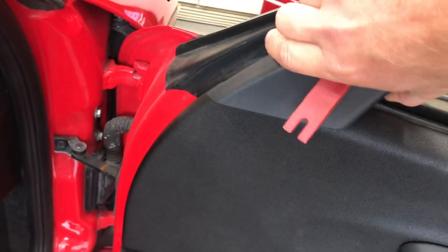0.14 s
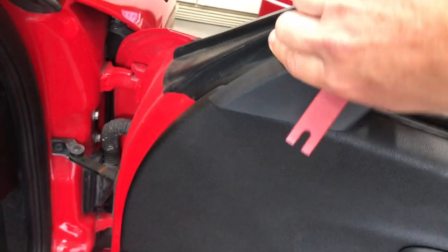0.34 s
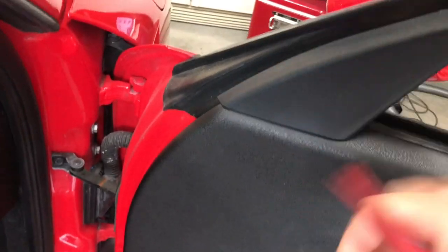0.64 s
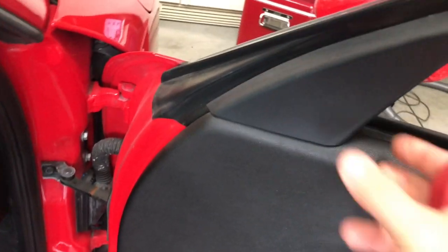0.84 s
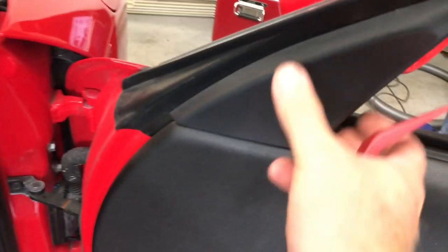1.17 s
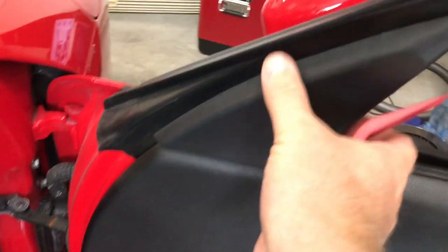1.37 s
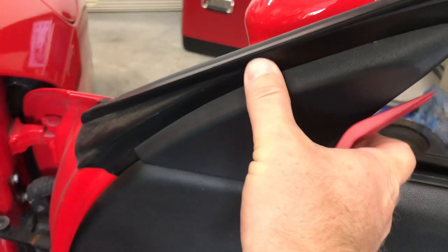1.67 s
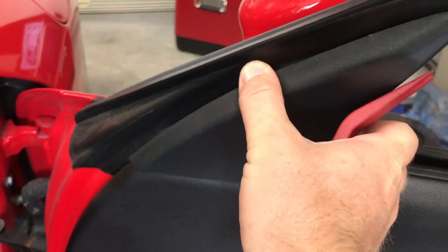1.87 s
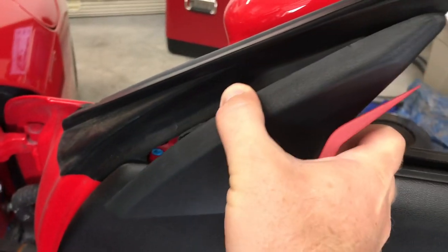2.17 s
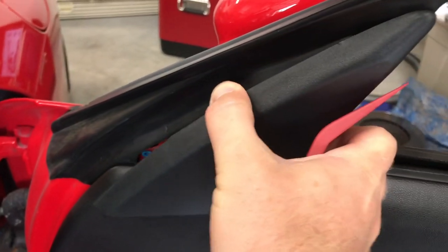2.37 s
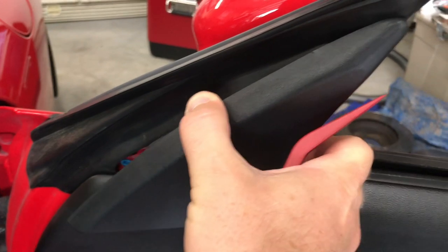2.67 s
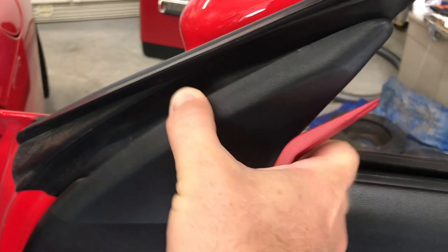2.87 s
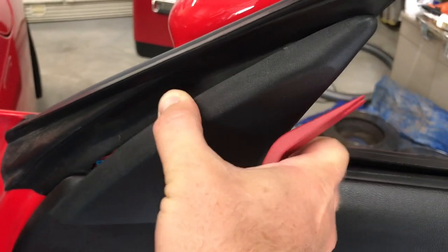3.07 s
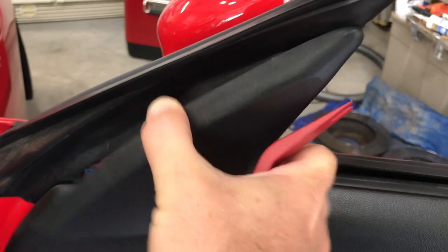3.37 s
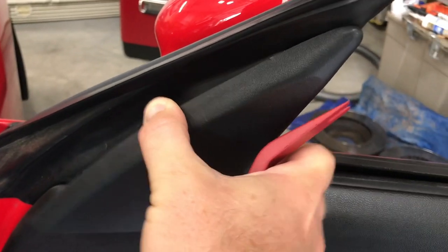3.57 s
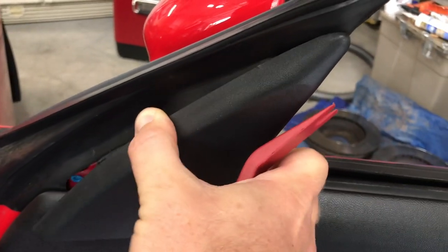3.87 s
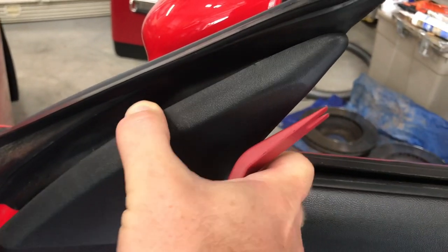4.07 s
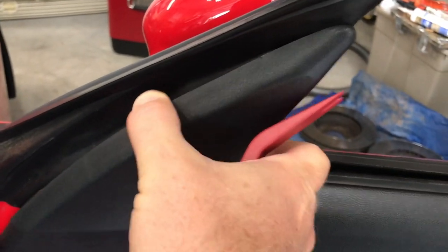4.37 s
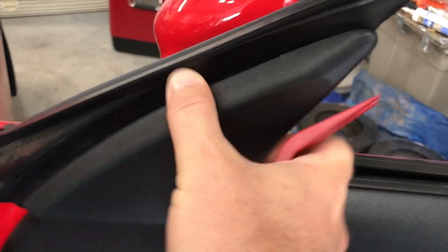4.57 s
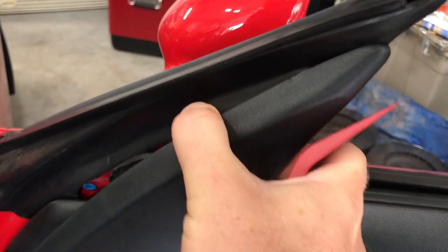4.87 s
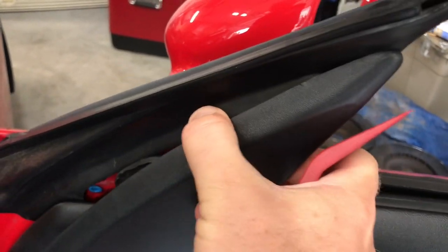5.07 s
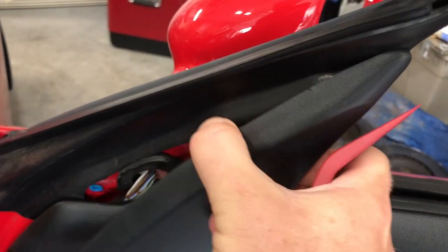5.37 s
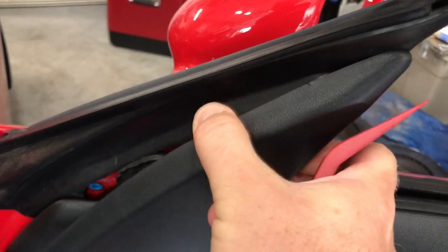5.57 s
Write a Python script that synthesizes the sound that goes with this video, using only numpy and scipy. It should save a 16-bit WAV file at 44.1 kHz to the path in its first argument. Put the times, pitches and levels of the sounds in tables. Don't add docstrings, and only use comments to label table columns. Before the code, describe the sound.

A phone close to a car door in a garage hears quiet low rumble, hiss and a faint steady band of insects. Tiny ticks start the scene; around 0.5 s they bunch into a quick plastic clatter and a short hollow pop as the pry tool springs free, with a brief scrape and soft door thump. A faint wavering distant whine lies under the first second. From 1 to 2.8 s there are only light skin rubs, small clicks and muted knocks as the hand finds its grip. At 2.87 s a bright, sharp snap rings the thin trim edge. Rocking then brings irregular clicks and short stuttering creaks, notably at 3.0, 3.2, 3.3 and 3.5 s, with dull low thumps, continuing more sparsely past 4 s. A strong double crack comes at about 5.08 s, with faint falling whines and a peep nearby, then small final clicks at 5.55-5.7 s.

```python
import sys
import numpy as np
from scipy import signal
from scipy.fft import rfft, irfft
from scipy.io import wavfile
from scipy.ndimage import uniform_filter1d

SR = 44100
rng = np.random.default_rng(int(sys.argv[2]) if len(sys.argv) > 2 else 0)


def voltage_ratio(decibels):
    exponent = np.asarray(decibels, float) / 20
    return 10 ** exponent


def dump_mix(stems):
    frames = np.atleast_2d(stems).T
    limited = np.clip(frames, -1, 1)
    pcm = np.round(limited * 32767).astype(np.int16)
    wavfile.write(sys.argv[1], SR, pcm)


N = 252241

# centre in Hz, level in dB, t60 in seconds.
EDGE_BANDS = [(3900, -11.5, 0.039), (4500, -5, 0.0093), (5525, 0.5, 0.019), (6890, -0.5, 0.014),
              (8470, -2, 0.017), (10700, -31.5, 0.0027), (11950, -11, 0.014), (13800, -25, 0.0041),
              (14900, -50, .011)]
PANEL_BANDS = [(1183, -6, 0.034), (1365, -0.5, 0.044), (1824, -1, 0.032), (2590, -0.5, 0.018),
               (3180, 0.5, 0.024)]
# frequency in Hz, level in dB, t60 in seconds.
HOLLOW_MODES = [(425, -10.5, 0.15), (336, -7, 0.12), (501, -11.5, 0.22), (612.6, 6, 0.046),
                (683, 0.5, 0.082), (875, 7.5, 0.02)]
TOOL_MODES = [(320, -3, 0.036), (405, -28, 0.11), (1600, -3, 0.078), (1800, -12, 0.065), (1750, 7.5, 0.034),
              (2060, -8, 0.062), (2360, -28, 0.045)]
# start in seconds, level in dB.
TOOL_POP = (.5336, -20)
# start in seconds, edge tick in dB, panel knock in dB, loudest knock mode in Hz, door hollow in dB.
GRIP_SLIPS = [(0.0601, -67, -57.5, 1960, -50), (0.2275, -50, -53, 1880, -52),
              (0.3593, -45, -43, 1530, -47.5), (0.4832, -66, -52, 1330, -46), (0.4897, -46, -48, 2000, -62),
              (0.5132, -40, -55, 1670, -60), (0.5249, -29.5, -36.5, 1770, -34.5),
              (0.5332, -28.5, -29, 1650, -29.5), (0.8483, -52, -76, 1770, -73),
              (1.045, -45, -40, 1650, -43), (1.0533, -36, -53, 1570, -37), (1.2184, -48, -50, 1530, -48),
              (1.2367, -45.5, -57, 1510, -46.5), (1.2717, -48, -66, 1650, -59),
              (1.5087, -53, -54, 3100, -52.5), (1.7755, -52, -57, 1970, -48.5),
              (1.8107, -51, -56.5, 1550, -52), (1.8709, -40.5, -38, 1640, -34.5),
              (2.0818, -45, -44, 1680, -42.5), (2.0992, -48, -48, 1920, -59),
              (2.2369, -62, -57.5, 2560, -49), (2.4508, -64, -52, 2500, -50),
              (2.7551, -65, -63.5, 3180, -67), (2.8602, -43, -49, 2700, -46)]
ROCK_SLIPS = [(2.8735, -18.5, -28.5, 3020, -27.5), (3.0343, -31.5, -39, 2420, -38),
              (3.1467, -42, -39, 2460, -37.5), (3.4735, -32.5, -36.5, 2480, -36),
              (3.8328, -46, -56, 3220, -52), (3.8734, -40, -40, 2460, -38), (3.8874, -45, -42.5, 1300, -62),
              (3.8944, -39, -39, 3070, -38.5), (3.9053, -35, -38, 3220, -55),
              (3.9129, -45, -47, 1830, -35.5), (4.029, -68, -58, 1000, -56),
              (4.1409, -31, -43.5, 2640, -58), (4.3539, -64, -47, 2650, -49),
              (4.3968, -46.5, -47.5, 1730, -41), (4.418, -33.5, -37, 2340, -39.5),
              (4.5096, -38.5, -54.5, 1300, -41), (4.694, -45.5, -58, 2650, -48),
              (4.9382, -45.5, -79, 3800, -80), (5.0721, -26.5, -29.5, 1824, -27),
              (5.2415, -45, -57, 1950, -46), (5.5461, -42, -50, 1300, -33.5), (5.552, -47, -47, 1680, -59),
              (5.6392, -57, -57, 1820, -50), (5.6955, -39, -44.5, 1630, -36.5)]


def slips():
    knock_cycles, hollow_lag_s, regrip_s, jerk_s = 73, 0.00487, 0.06, 0.00027
    out, hollow, last_s = np.zeros(N + SR), np.zeros(N + SR), -1
    rows = sorted(GRIP_SLIPS + ROCK_SLIPS + creaks())
    jerks = 0.18 * rng.standard_normal((len(rows), 64)) * np.exp(-np.arange(64) / (jerk_s * SR))
    for (s, tick_db, knock_db, hz, hollow_db), jerk in zip(rows, jerks):
        if s - last_s > regrip_s:
            edge = rattle(EDGE_BANDS)
            panel = rattle([(f, db - 4 * abs(np.log2(f / hz)), t60) for f, db, t60 in PANEL_BANDS])
        last_s = s
        push = np.append(1, jerk)
        push = push / np.linalg.norm(push)
        plate = voltage_ratio(tick_db + 2.5) * edge + voltage_ratio(knock_db + 4.0) * panel
        add_at(out, s, np.convolve(push, plate))
        cluster = [(hz, 0, knock_cycles / hz), (1.19 * hz, -7, 0.025), (0.86 * hz, -9, 0.025)]
        add_at(out, s, voltage_ratio(knock_db + 0.5) * ring(cluster, 0.00018))
        hollow[int(s * SR) + int(hollow_lag_s * SR)] += voltage_ratio(hollow_db - 4.0)
    pop_s, pop_db = TOOL_POP
    add_at(out, pop_s, voltage_ratio(pop_db) * ring(TOOL_MODES, 0.0011))
    return out[:N] + strike(hollow, ring(HOLLOW_MODES, 0.00074))


# first slip in seconds, last slip in seconds, first tick in dB,
# last tick in dB, last knock in dB.
CREAKS = [(2.5545, 2.576, -70, -67.5, -53.5), (2.9846, 3.0001, -50, -41, -52),
          (3.007, 3.0223, -34, -29, -39.5), (3.166, 3.201, -45, -27, -33.5),
          (3.29, 3.3031, -52, -56.5, -58.5), (3.304, 3.3704, -54, -26, -37.5),
          (3.4837, 3.5253, -34.5, -28, -36.5), (3.719, 3.737, -38, -28.5, -36.5),
          (4.0825, 4.1, -49.5, -54.5, -59), (4.1476, 4.163, -31.5, -28, -34),
          (5.0834, 5.098, -19, -20, -30.5)]
CREAK_SLIPS = (3, 3, 3, 4, 4, 10, 8, 3, 4, 3, 2)


def creaks():
    slowing_db = 36
    easing = 1.12
    knock_follows, knock_hz, hz_spread, scatter_db = 0.73, 2677, 0.046, 0.98
    hollow_db, hollow_top_db = 0, -28.5
    rows = []
    for (first_s, last_s, first_db, last_db, last_knock_db), count in zip(CREAKS, CREAK_SLIPS):
        gaps = np.exp((last_db - first_db) / slowing_db * np.linspace(0, 1, count - 1))
        s = first_s + (last_s - first_s) * np.append(0, np.cumsum(gaps)) / gaps.sum()
        tick_db = last_db + (first_db - last_db) * np.linspace(1, 0, count) ** easing
        chance = rng.standard_normal((count, 4)).T
        scatter = scatter_db * chance[:3]
        knock_db = last_knock_db + knock_follows * (tick_db - last_db)
        door_db = tick_db + np.minimum(hollow_db, hollow_top_db - tick_db)
        hz = knock_hz * np.exp(hz_spread * chance[3])
        rows += zip(s, tick_db + scatter[0], knock_db + scatter[1], hz, door_db + scatter[2])
    return rows


def rattle(bands):
    travel_s = 0.00072
    t, y = np.arange(SR // 20) / SR, 0
    for (hz, db, t60), noise in zip(bands, rng.standard_normal((len(bands), len(t)))):
        lag_s = travel_s / np.sqrt(hz / 1000)
        fade = (1 - np.exp(-(t / lag_s) ** 2)) * 1000 ** (-t / t60)
        burst = fade * band(noise, hz, 0.21 * hz)
        y = y + voltage_ratio(db) * burst / np.linalg.norm(burst)
    return y / np.abs(y).max()


def ring(modes, rise_s):
    t, y = np.arange(SR // 4) / SR, 0
    for k, (hz, db, t60) in enumerate(modes):
        y = y + (-1) ** k * voltage_ratio(db) * np.sin(2 * np.pi * hz * t) * 1000 ** (-t / t60)
    y = y * (1 - np.exp(-t / rise_s))
    return y / np.abs(y).max()


def strike(force, response):
    return signal.fftconvolve(force, response)[:N]


def add_at(out, s, sound):
    i = int(s * SR)
    out[i:i + len(sound)] += sound


def band(x, hz, width_hz):
    b, a = signal.iirpeak(hz, hz / width_hz, SR)
    return signal.lfilter(b, a, signal.lfilter(b, a, x))


def unit(x):
    return x / np.sqrt(np.mean(x ** 2))


def walk(rate_hz):
    k = int(SR / rate_hz)
    steps = np.repeat(rng.standard_normal(N // k + 1), k)
    return unit(uniform_filter1d(uniform_filter1d(steps, k), k)[:N])


# start in seconds, length in seconds, level in dB, weight on the door in dB.
TOOL_DRAGS = [(0.478, 0.04, -51.5, -9), (0.506, 0.015, -41.5, -15), (0.525, 0.0262, -41, -11)]
SKIN_SLIDES = [(0.364, 0.084, -68.5, 6), (1.035, 0.038, -65, 7), (1.116, 0.041, -60, -3),
               (1.197, 0.061, -61, -1.5), (1.248, 0.025, -74, 0), (1.452, 0.082, -66, -1),
               (1.723, 0.072, -65.5, -1.5), (1.934, 0.16, -69, -2), (4.494, 0.11, -62, -1.5),
               (5.534, 0.026, -61, 0)]
EDGE_SCRAPES = [(1.35, 0.02, -62, -18), (1.592, 0.017, -68, 2.5), (1.814, 0.069, -68.5, 2),
                (1.866, 0.11, -69.5, -4), (2.088, 0.042, -52, 1.2), (2.51, 0.025, -66, -1.5),
                (2.536, 0.051, -64.5, 6.5), (2.612, 0.011, -70, 6), (3.671, 0.045, -64.5, 1.5),
                (3.893, 0.0277, -47, 0), (4.019, 0.037, -62.5, 3.5), (4.084, 0.052, -65, 3),
                (4.339, 0.038, -57, 1.5), (5.318, 0.053, -68.5, 1)]
PALM_PRESSES = [(0.041, 0.052, -73, 7.5), (0.529, 0.027, -64, 5), (0.581, 0.053, -79, 9),
                (2.231, 0.023, -84.5, 25.6), (2.973, 0.053, -71, 8), (4.676, 0.038, -66.5, 8.1),
                (5.13, 0.12, -66, 1.3)]


def rubs():
    t = np.arange(N) / SR
    grit = rng.standard_normal(N) * voltage_ratio(3.35 * rng.exponential(size=N)) * voltage_ratio(1.4 * walk(150))
    sizzle = band(grit, 9000, 7000) + 0.9 * band(grit, 11500, 350)
    scrape = band(grit, 4600, 3500) + 1.3 * band(grit, 2650, 350)
    panel = band(grit, 1570, 1040) + 2.5 * band(grit, 1630, 190)
    hollow = band(grit, 720, 1570) + 0.0011 * strike(grit, ring(HOLLOW_MODES, 0.0038))
    # sizzle, scrape, panel in dB
    touches = ((TOOL_DRAGS, (-13.5, -0.54, 1.5)), (SKIN_SLIDES, (-1.5, 1, -5.5)),
               (EDGE_SCRAPES, (-22, 0.1, -8.5)), (PALM_PRESSES, (-14, -3, -0.67)))
    pressure = np.zeros((4, N))
    for rows, feeds_db in touches:
        for s, length_s, db, weight_db in rows:
            press = (t - s) / (0.18 * length_s)
            lift = (s + length_s - t) / (0.09 * length_s) + 0.5
            touch = np.clip(np.minimum(press, lift), 0, 1)
            pressure += voltage_ratio(db + np.append(feeds_db, weight_db) - 0.5)[:, None] * touch
    return sum(p * unit(x) for p, x in zip(pressure, (sizzle, scrape, panel, hollow)))


# start in seconds, peak in dB, frequency in Hz.
THUMPS = [(0.534, -34.5, 152), (1.047, -43.5, 153.6), (1.876, -52, 195), (2.101, -52, 214),
          (2.876, -49.5, 173), (3.028, -49, 247), (3.181, -47.5, 283), (3.363, -47, 239), (3.503, -38, 169),
          (3.741, -45, 164.5), (3.897, -49.5, 236), (4.157, -45, 159), (4.425, -51, 169.5),
          (5.086, -53, 174), (5.554, -42, 172), (5.693, -55, 262)]
# start in seconds, peak in dB, frequency in Hz, t60 in seconds.
BUMPS = [(.4, -60, 110, .2), (.535, -45, 75, .35), (1.52, -58, 190, .15), (1.79, -54, 150, .15),
         (2.08, -56, 150, .15), (2.57, -60, 200, .15), (3.02, -53, 160, .2), (3.19, -54, 150, .2),
         (3.36, -55, 160, .15), (4.03, -56, 170, .15), (5.638, -54, 170, .08)]


def thumps():
    thump_t60_s = 0.17
    out = np.zeros(N + SR)
    for s, db, hz, t60 in [(*row, thump_t60_s) for row in THUMPS] + BUMPS:
        modes = [(hz, 0, t60), (1.3 * hz, -6, 0.12), (0.818 * hz, -9, 0.15), (1.846 * hz, -8, 0.1)]
        add_at(out, s, voltage_ratio(db) * ring(modes, 0.01))
    return out[:N]


# band in Hz, level under the direct sound in dB, t60 in seconds.
GARAGE = [(232, -1, 0.38), (495, -3.5, 0.18), (753, -11.5, 0.42), (1300, -18.5, 0.48), (2020, -10.5, 0.18),
          (3220, -13.5, 0.69), (5500, -18.5, 0.3), (7600, -20, 0.41), (11000, -38, 0.1)]


def garage(x):
    out = 0
    for hz, db, t60 in GARAGE:
        keep = 1e6 ** (-1 / (t60 * SR))
        power = uniform_filter1d(band(x, hz, 0.44 * hz) ** 2, int(0.0012 * SR))
        power = signal.lfilter([1 - keep], [1, -keep], power)
        level = np.sqrt(np.abs(np.roll(power, int(0.0019 * SR))))
        out = out + voltage_ratio(db) * level * unit(band(rng.standard_normal(N), hz, 1.04 * hz))
    return out


# frequency in Hz, density in dB per Hz.
AIR = [(28, -19), (42, 0.5), (58, 2), (85, -5.5), (290, -13.5), (700, -25), (1330, -25), (2500, -30.5),
       (5000, -37), (8000, -35.5), (10000, -34.5), (10600, -42), (16000, -41)]


def air():
    hz = np.maximum(np.fft.rfftfreq(N, 1 / SR), 1)
    air_hz, air_db = np.transpose(AIR)
    shape = voltage_ratio(np.interp(np.log(hz), np.log(air_hz), air_db))
    hiss = irfft(rfft(rng.standard_normal(N)) * shape, N)
    return voltage_ratio(-60.5 + 0.09 * walk(4.42)) * unit(hiss)


# centre in Hz, width in Hz, level in dB, swell in dB.
CHORUS = (6648, 534, -65, 0.5)
# centre in Hz, width in Hz, chirps per second, first chirp in seconds, level in dB.
CHIRPS = [(9700, 500, 4.5, .1, 0), (8800, 600, 3.1, .2, -4)]
# time in seconds, level in dB.
CHIRP_DB = [(0, -82), (1, -81), (2, -82), (2.8, -83), (3.6, -87), (4.5, -91), (5.72, -88)]


def insects():
    t = np.arange(N) / SR
    hz, width_hz, db, swell_db = CHORUS
    out = voltage_ratio(db + swell_db * walk(21)) * unit(band(rng.standard_normal(N), hz, width_hz))
    chirp_db = np.interp(t, *np.transpose(CHIRP_DB))
    for hz, width_hz, rate_hz, first_s, db in CHIRPS:
        pulse = 0.12 + np.cos(np.pi * rate_hz * (t - first_s)) ** 2
        song = unit(band(rng.standard_normal(N), hz, width_hz))
        out = out + voltage_ratio(chirp_db + db + 1.2 * walk(3.1)) * pulse * song
    return out


# time in seconds, centre in Hz, level in dB.
WHINES = [
    [(0, 1740, -81), (.1, 1760, -71.5), (.45, 1735, -72), (.58, 1706, -62), (.75, 1725, -74),
     (.95, 1710, -68), (1.05, 1740, -84)],
    [(4.75, 4500, -91), (4.85, 4500, -77), (5.0, 4440, -86), (5.15, 4250, -92)],
    [(4.75, 3900, -92), (4.85, 3900, -77), (5.1, 3740, -77), (5.3, 3750, -73), (5.4, 3530, -71),
     (5.53, 3530, -74), (5.62, 3570, -75)],
    [(5.305, 1750, -83), (5.33, 1824, -76), (5.365, 1814, -62), (5.38, 1820, -80)],
]
WHINE_WIDTH_HZ = (100, 500, 500, 120)


def whines():
    out, t = 0, np.arange(N) / SR
    for rows, width_hz in zip(WHINES, WHINE_WIDTH_HZ):
        s, hz, db = np.transpose(rows)
        slow = uniform_filter1d(rng.standard_normal((2, N)), int(SR / width_hz), axis=1)
        phase = 2 * np.pi * np.cumsum(np.interp(t, s, hz)) / SR
        tone = unit(slow[0] * np.cos(phase) + slow[1] * np.sin(phase))
        out = out + voltage_ratio(np.interp(t, s, db, -120, -120) + 2.3 * walk(11)) * tone
    return out


def scene():
    trim = slips() + rubs() + thumps()
    return (trim + garage(trim) + air() + insects() + whines())[None]


def roll_off(x):
    return signal.sosfilt(signal.butter(12, 15750, fs=SR, output="sos"), x)


def record(dry):
    top_cut = signal.ellip(8, 0.2, 40, 15800, fs=SR, output="sos")
    bass_cut = signal.butter(6, 38, "high", fs=SR, output="sos")
    heard = signal.sosfilt(bass_cut, signal.sosfilt(top_cut, dry))
    return roll_off(heard)


dry = scene()
out = record(dry)
dump_mix(out)
```